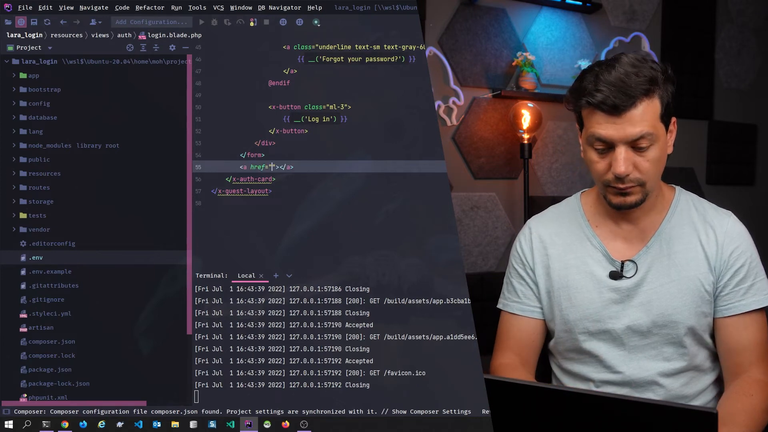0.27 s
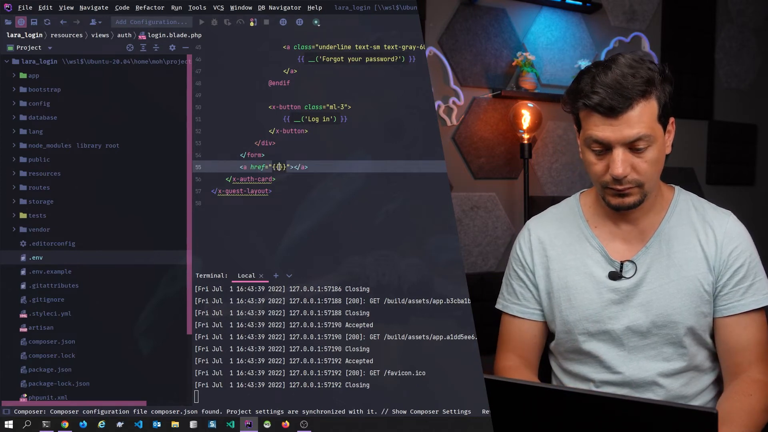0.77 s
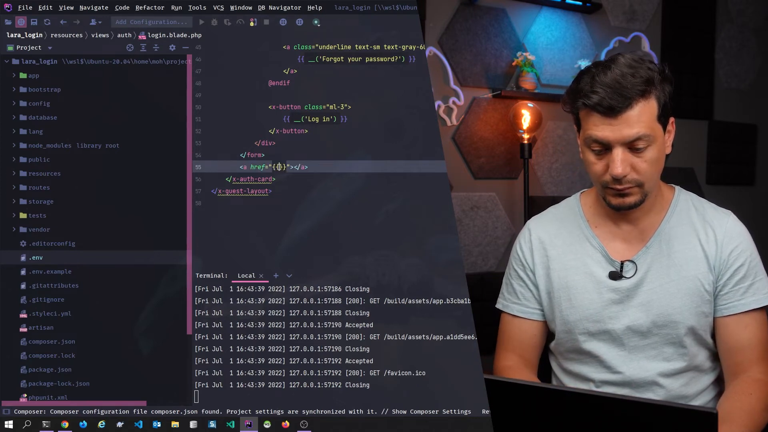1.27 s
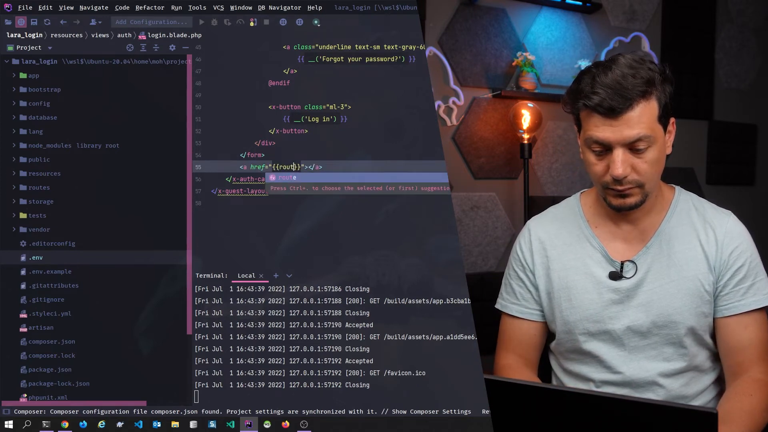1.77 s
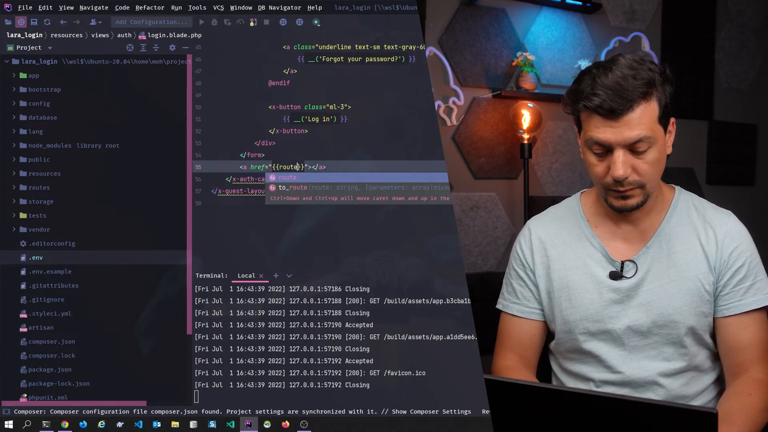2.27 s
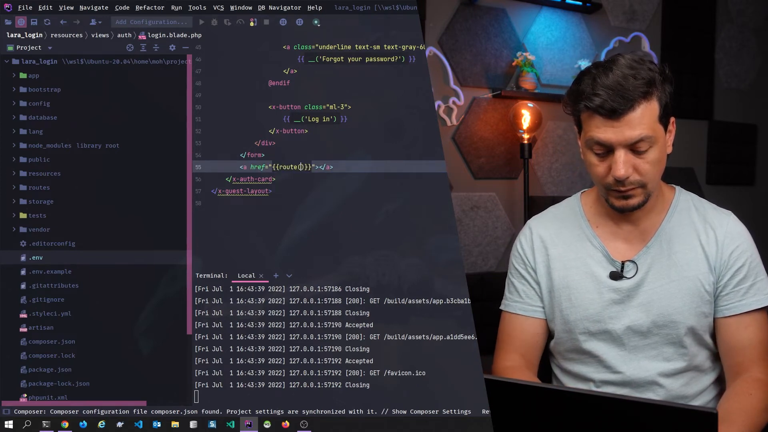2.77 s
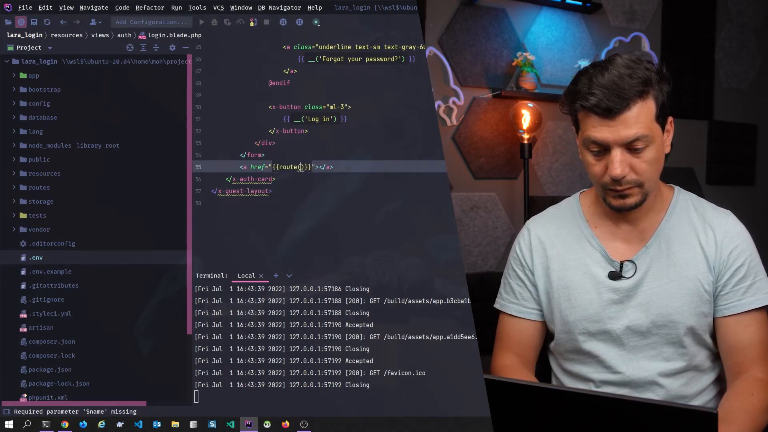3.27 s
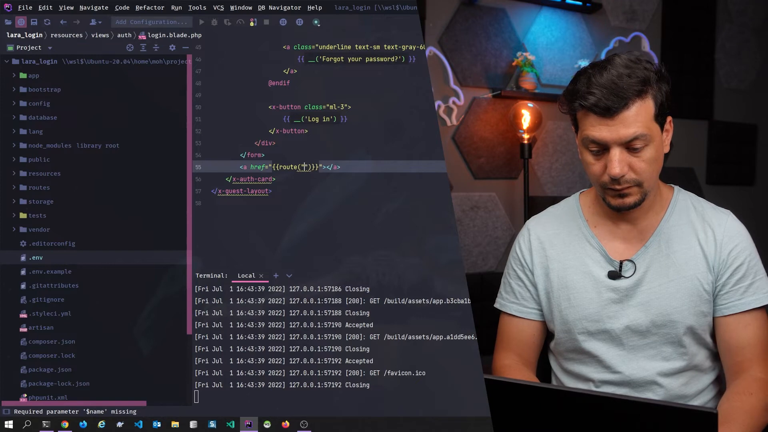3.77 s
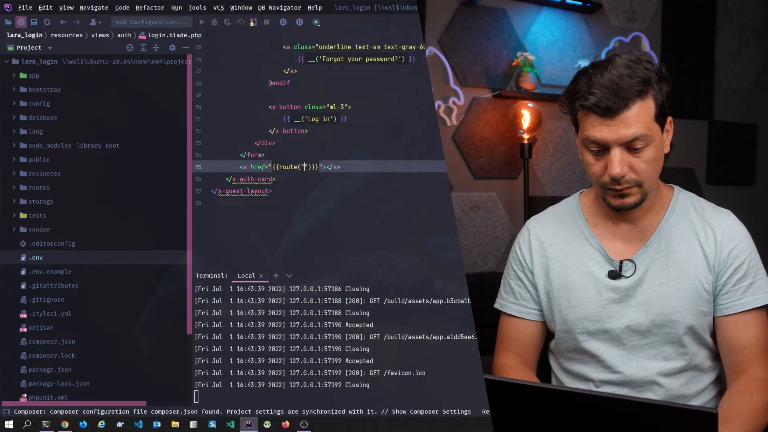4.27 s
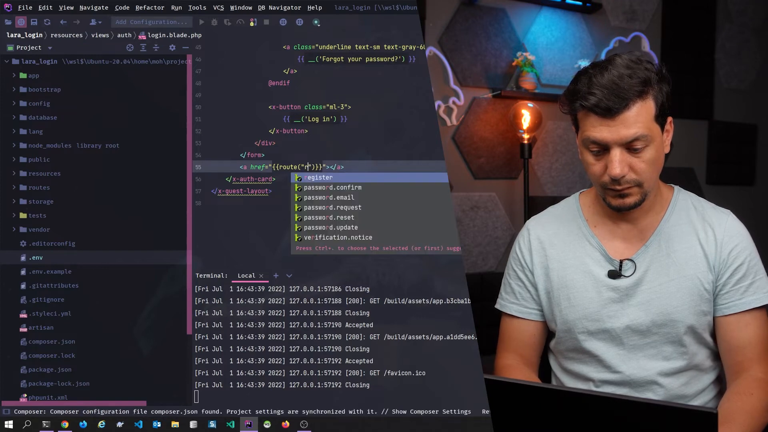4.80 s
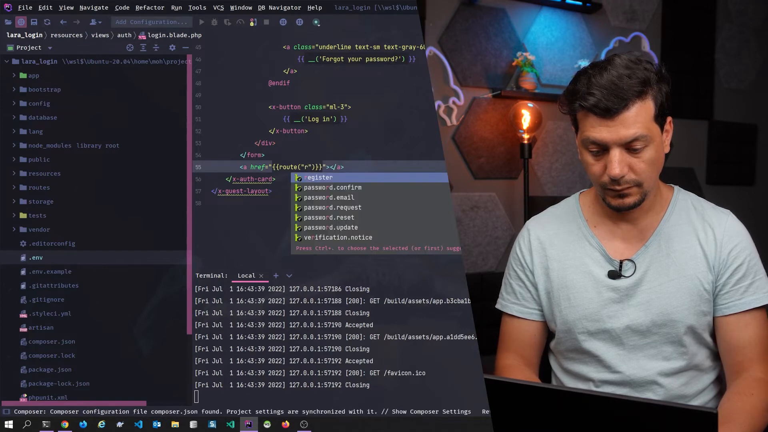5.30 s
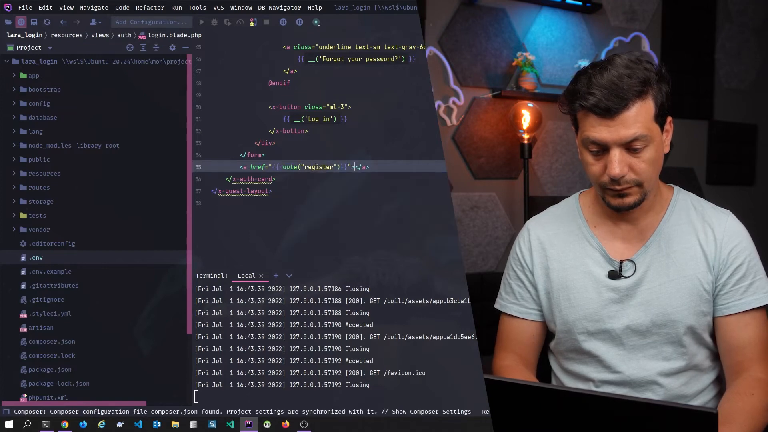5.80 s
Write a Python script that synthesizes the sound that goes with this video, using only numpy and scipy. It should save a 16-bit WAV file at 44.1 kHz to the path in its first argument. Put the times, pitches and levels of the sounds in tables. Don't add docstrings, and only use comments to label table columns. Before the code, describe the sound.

In a quiet damped room someone taps keys sparsely, pauses, then strikes a big key hard twice near the end.

```python
import sys
import numpy as np
from scipy import signal
from scipy.fft import rfft, irfft, next_fast_len
from scipy.io import wavfile

SR = 44100
rng = np.random.default_rng(int(sys.argv[2]) if len(sys.argv) > 2 else 0)


def wav_out(sig):
    wavfile.write(sys.argv[1], SR, np.round(np.clip(np.atleast_2d(sig).T, -1, 1) * 32767).astype(np.int16))


def decibels_to_gain(level_db):
    exponent = np.asarray(level_db, float) / 20
    return 10 ** exponent


N = 266584

# [f/Hz, level/dB per Hz]
AIR_SPECTRUM = [(41, -45), (70, -3.5), (115, -2), (181, -3.5), (420, -13), (539, -13), (757, -13.5),
                (867, -13), (1710, -13), (1960, -13.5), (2410, -11.5), (3960, -27), (15800, -33.5)]
# [f/Hz, width/Hz, lift/dB]
FAN_RESONANCES = [(532.44,120,5),(1068,20,3.5),(1343.3,160,3),(1720,49,4),(2347,170,3.5),(2747,45,8),(2975,30,6),(4240,1900,4.5),(8450,250,2.5)]
# [t/s, rumble level/dB]
STIR = [(0, -62), (.5, -61), (1.2, -62), (1.6, -61.5), (2.1, -61.5), (2.5, -63.5), (3.2, -64.5), (3.8, -64),
        (4.7, -64), (4.95, -62.5), (5.4, -66), (6.04, -62)]
# [f/Hz, t60/s, level/dB]
ROOM_BANDS = [(150,0.14,-7),(375,0.24,-5.5),(690,0.24,-4.5),(1300,0.25,-11),(2324.8,0.19,-8),(3400,0.15,-6),(6000,0.2064,-9.5),(8860,0.1,-11.5),(13648,0.17,-9.5)]
# [f/Hz, level/dB, t60/s]
DESK_MODES = [(98,5.5,0.15),(135,0,0.24),(166,-23,0.1449),(198.8,-5,0.19),(247,-0.5,0.053),(319.7,-6.5,0.12),(364,-15,0.16),(430,-8.5,0.0915)]
# [f/Hz, level/dB, t60/s]
CASE_MODES = [(512,2.5,0.047),(647,3,0.017),(710,0,0.029),(812,-3.5,0.044),(886,1.5,0.021),(1110.6,-0.5,0.036),(1230,5.5,0.019),(1384,-1,0.02),(1467,2,0.03737),(1725,9,0.0057),(2020,-20,0.073),(2060,4.5,0.0085),(2505,2.5,.025),(2690,-1.5,0.041),(3230,-1,0.01765),(3500,-2,0.027),(3837.8,-1,0.0098),(4420,-10,0.01087)]
# [t/s, peak level/dB, f/Hz]
DESK_THUDS = [(0.095,-42.5,208),(.100,-40.5,135),(.174,-44,141),(0.263,-46.5,135),(0.361,-48,135),(.777,-51.5,237),(.922,-46.5,130),(.985,-45,177),(1.115,-53,135),(1.165,-45.5,141),(1.205,-50,150),(1.568,-52,150),(1.934,-45,337),(1.933,-42.5,128),(1.971,-59,100),(2.015,-47,98),(2.041,-52,180),(2.085,-50.5,110),(2.088,-51.5,509),(2.18,-55,333),(2.409,-63,100),(3.275,-54.5,179),(3.809,-50,311.6),(3.866,-50,168),(5.056,-46,135),(5.058,-49.5,430),(5.389,-49,146),(5.39,-49.5,420),(5.398,-58,504),(6.0,-50.5,109)]
# [t after blow/s, level re blow/dB, f/Hz]
BIG_THUDS = [
    (-.004, -18, 300),
    (.001, -21.5, 165),
    (-.0035, -16.5, 1000),
]
# [t/s, knock level/dB, rattle level/dB]
BIG_STROKES = [
    (4.941, -18.5, -32),
    (5.281, -21, -33),
]
# [f/Hz, level/dB, t60/s]
BIG_CASE_MODES = [(315,3.5,0.024),(420,-20.5,0.04314),(530,-9,0.052),(665,5.5,0.025),(780,-22,0.0199),(945,4.5,0.031),(1040,11.5,0.024),(1437,7.5,0.013),(1830,20,0.0052),(2110,7.5,.014),(2320,5.5,0.03),(2800,-19.5,0.01014),(3113,-27,0.01197),(3770,-31.5,0.00666)]
# [f/Hz, level/dB per Hz]
BIG_RATTLE_SPECTRUM = [(1760, -6.5), (3000, -2), (5440, -21), (8520, -6), (9400, -18), (10200, -12),
                       (14000, -35), (16000, -28.5)]
# [delay/ms, level/dB]
BOUNCES = [
    (0, 5.5),
    (1.6, 6),
    (2.3, 7),
    (4.2, -2),
]
# [t/s, cap rattle level/dB, snap level/dB, snap f/Hz, hollow knock level/dB]
KEY_PRESSES = [(0.0934,-41.5,-33.5,2200,-44.5),(.1745,-50,-41,2080,-47.5),(.249,-51.5,-45,2300,-54),(.361,-57,-40.5,2310,-56.5),(.531,-54,-48.5,2596,-57),(0.9448,-44,-46.5,2546,-50),(1.112,-59,-45.5,2020,-53.5),(1.202,-50,-45.5,1700,-62),(1.568,-53,-46,2864,-53.5),(1.9308,-41,-39.5,1596,-50),(1.942,-44,-41,1852,-57),(1.9643,-49,-49,1787,-60),(2.078,-49,-49,1500,-58),(2.984,-49.5,-49.5,1300,-44.5),(3.153,-49,-44.5,1670,-49.5),(3.2228,-46,-47.5,1705,-51.5),(3.489,-48.5,-44.5,2320,-62),(3.7536,-41,-46.5,2900,-49),(3.8624,-41,-40,1440,-40),(3.884,-51,-43.5,2000,-57),(5.3887,-46,-45.5,1500,-52)]
# [t/s, peak level/dB, length/ms]
CAP_TICKS = [(.788,-57.5,5),(.988,-55,4),(1.154,-45,4),(1.34,-60.5,4),(1.9318,-33,2.5),(2.0864,-44,5),(2.109,-49.5,6),(2.178,-52,6),(3.8645,-44,1.5),(5.0555,-42,5.5),(5.0595,-51,6),(5.398,-40.5,3.5),(5.575,-58,4)]
# [t/s, level/dB, f/Hz, t60/s]
SPRINGS = [
    (.095,-58,8200,0.09),
    (2.986,-60,8500,0.11),
    (3.756,-64,8400,0.1108),
    (4.945,-53,6100,0.2069),
    (5.285,-55,6520,0.18),
    (5.398,-65,6750,0.2545),
]


def clock(seconds):
    return np.arange(int(seconds * SR)) / SR


def fade(t, t60):
    return np.exp(-np.log(1000) * t / t60)


def ring(modes, extra_db, seconds=.3, flip=-1):
    hz, db, t60 = np.array(modes, float).T[:, :, None]
    t = clock(seconds)
    sign = flip ** np.arange(len(modes))[:, None]
    partials = np.sin(2 * np.pi * hz * t) * fade(t, t60)
    return np.sum(sign * decibels_to_gain(db + extra_db) * partials, axis=0)


def shaped(x, hz, db):
    size = next_fast_len(len(x), True)
    f = np.maximum(np.fft.rfftfreq(size, 1 / SR), 1)
    gain = decibels_to_gain(np.interp(np.log(f), np.log(hz), db))
    return irfft(rfft(x, size) * gain, size)[:len(x)]


def band(x, lo_hz, hi_hz):
    edges_hz = [lo_hz, min(hi_hz, .45 * SR)]
    return signal.sosfilt(signal.butter(2, edges_hz, "bandpass", fs=SR, output="sos"), x)


def add(out, s, sound, peak_db):
    i = int(s * SR)
    sound = sound[:N - i]
    out[i:i + len(sound)] += sound * decibels_to_gain(peak_db) / np.max(np.abs(sound))


def push(ms):
    return np.hanning(max(int(ms * SR / 1000), 3) + 2)


def rattle(noise, decay_ms, rise_ms):
    t_ms = clock(0.075) * 1000
    uneven_db = 4.5 * np.repeat(noise[1], 30)[:len(t_ms)]
    grains = noise[0, :len(t_ms)] * decibels_to_gain(uneven_db)
    return grains * (1 - np.exp(-t_ms / rise_ms)) * np.exp(-t_ms / decay_ms)


def air():
    hiss_db, sway_db, sway_follows_stir = -61, -53, 0.067
    hz = np.geomspace(40, 16000, num=600)
    air_hz, air_db = np.transpose(AIR_SPECTRUM)
    db = np.interp(np.log(hz), np.log(air_hz), air_db)
    for f, width_hz, lift_db in FAN_RESONANCES:
        db = db + lift_db / (1 + (2 * (hz - f) / width_hz) ** 2)
    hiss = shaped(rng.standard_normal(N), hz, db)
    hiss = hiss * decibels_to_gain(hiss_db) / np.std(shaped(hiss, [290, 300], [-80, 0]))

    s, stir_db = np.transpose(STIR)
    rumble_db = np.interp(np.arange(N) / SR, s, stir_db)
    sway = shaped(rng.standard_normal(N), [1.5, 3, 14, 30, 60], [-14, 14.5, 5.0, -5.5, -49.5])
    rumble = shaped(rng.standard_normal(N), [15, 28, 60, 100, 150], [-34, 1.0, -5, -13, -52.5])
    swell_db = sway_db + sway_follows_stir * (rumble_db - np.mean(stir_db))
    sway = sway / np.std(sway) * decibels_to_gain(swell_db)
    return hiss + sway + rumble / np.std(rumble) * decibels_to_gain(rumble_db)


def room(x):
    t = clock(.4)
    tail = 0
    for hz, t60, db in ROOM_BANDS:
        part = band(rng.standard_normal(len(t)), hz / 1.46, hz * 1.44) * fade(t, t60)
        tail = tail + decibels_to_gain(db) * part / np.sqrt(np.sum(part ** 2) * SR / 2 / hz / 1.23)
    tail = tail * np.clip((t - .005) / 0.0016, 0, 1)
    return signal.fftconvolve(x, tail)[:N]


def knocks():
    lag_s, hollow_hz = 0.00083, 694
    snap_oct, hollow_oct, thud_oct = .48, 0.35, 0.376
    rows = [(s + lag_s, db, hz, snap_oct) for s, _, db, hz, _ in KEY_PRESSES]
    rows += [(s + lag_s, db, hollow_hz, hollow_oct) for s, *_, db in KEY_PRESSES]
    for s, db, _ in BIG_STROKES:
        rows += [(s + delay_s, db + below_db, hz, snap_oct) for delay_s, below_db, hz in BIG_THUDS]
    return rows + [(*row, thud_oct) for row in DESK_THUDS]


def desk():
    out = np.zeros(N)
    modes = np.array(DESK_MODES + CASE_MODES)
    modes[:, 2] = np.minimum(modes[:, 2], 55 / modes[:, 0])
    rows = knocks()
    chance = rng.standard_normal((len(rows), 2, 4000))
    for (s, db, hz, reach_oct), noise in zip(rows, chance):
        force = rattle(noise, 2.24, rise_ms=0.28)[:700]
        octaves = np.log2(modes[:, 0] / hz)
        place_db = -6 * (octaves / reach_oct) ** 2 + 1.2 * noise[1, -len(modes):]
        near = place_db > -35
        turns = np.exp(2j * np.pi * modes[near, :1] * np.arange(len(force)) / SR)
        share = np.abs(turns @ force)
        share_db = 20 * np.log10(np.hypot(share, .6 * np.linalg.norm(force)))
        gains_db = (place_db[near] - share_db)[:, None]
        response = ring(modes[near], gains_db, min(.3, .04 + 40 / hz))
        add(out, s, signal.fftconvolve(force, response), db)
    return out


def big_key():
    out = np.zeros(N)
    lead_s, scrape_lead_s = .0004, .0046
    force = np.zeros(400)
    for delay_ms, db in BOUNCES:
        force[int(delay_ms * SR / 1000)] += decibels_to_gain(db)
    force = np.convolve(force, push(.12))
    chance = rng.standard_normal((len(BIG_STROKES), 3, 4000))
    for (s, knock_db, rattle_db), noise in zip(BIG_STROKES, chance):
        vary_db = 0.89 * noise[1, -len(BIG_CASE_MODES):, None]
        blow = np.convolve(force, ring(BIG_CASE_MODES, vary_db, .08, flip=0.92))
        add(out, s - lead_s, -band(blow, 224.0, 8000), knock_db + 4.5)

        scrape = band(rattle(noise, 5.4, rise_ms=3.8), 708, 12233)
        add(out, s - scrape_lead_s, scrape, rattle_db + 6.5)

        landing = rattle(noise[1:], 3.5, rise_ms=0.388)
        landing = shaped(landing, *np.transpose(BIG_RATTLE_SPECTRUM))
        add(out, s - lead_s, landing, rattle_db + 11.0)

        clatter = band(rattle(noise[::-2], 27.0, rise_ms=2.4), 2000, 2940)
        add(out, s + 0.0086, clatter, knock_db - 15.5)
    return out


def keys():
    out = np.zeros(N)
    press_ms, shorter_ms_per_db = 3.7, 0.15
    colour_hz = [2000, 3300, 4200, 4900, 7200, 10000, 16000]
    colour_db = [-2, -1.5, -7, 0.5, -1.5, -8.0, -13.0]
    rows = [(s, db, max(press_ms - shorter_ms_per_db * (db + 39.5), 1.5)) for s, db, *_ in KEY_PRESSES]
    rows += CAP_TICKS
    chance = rng.standard_normal((len(rows), 2, 4000))
    for (s, db, ms), noise in zip(rows, chance):
        add(out, s, shaped(rattle(noise, ms, rise_ms=.35 * ms), colour_hz, colour_db), db)
    for s, db, hz, t60 in SPRINGS:
        add(out, s, ring([(hz, 0, t60), (1.012 * hz, -5, t60)], 0), db)
    return out


def scene():
    near = keys() + big_key() + desk()
    return (near + room(near) + air())[None]


def low_pass(x):
    return signal.sosfilt(signal.butter(12, 16460, fs=SR, output="sos"), x)


def record(dry):
    top_hz = 15830
    dull = shaped(dry[0], [top_hz, top_hz + 60, top_hz + 620, top_hz + 660], [0, -20, -24, -90])
    return low_pass(dull[None])


dry = scene()
out = record(dry)
wav_out(out)
```